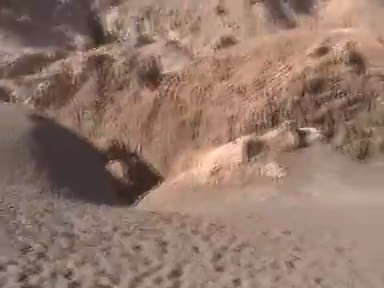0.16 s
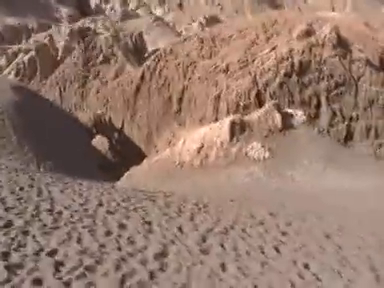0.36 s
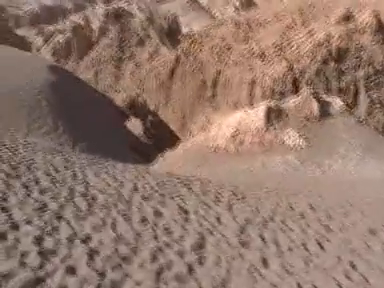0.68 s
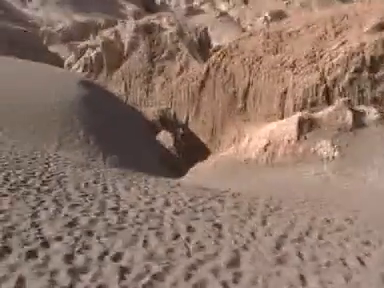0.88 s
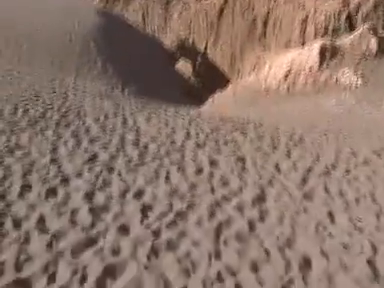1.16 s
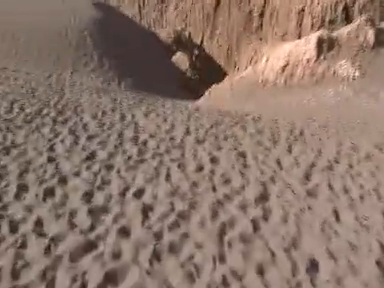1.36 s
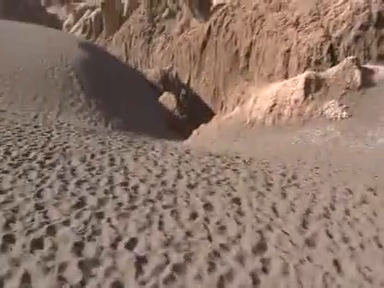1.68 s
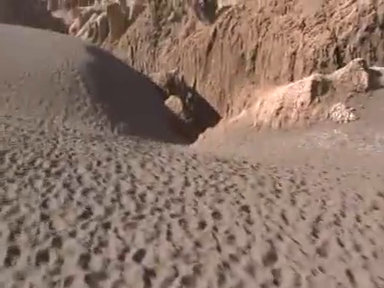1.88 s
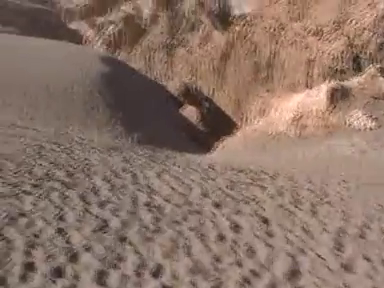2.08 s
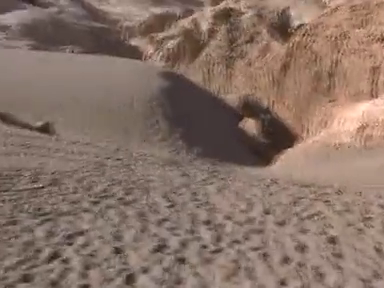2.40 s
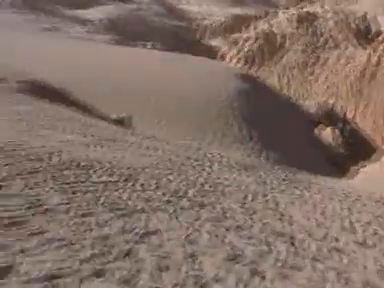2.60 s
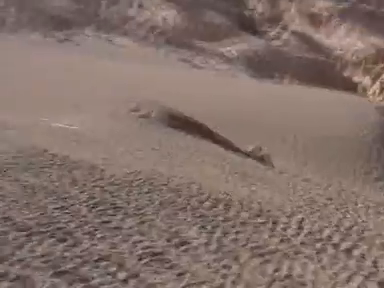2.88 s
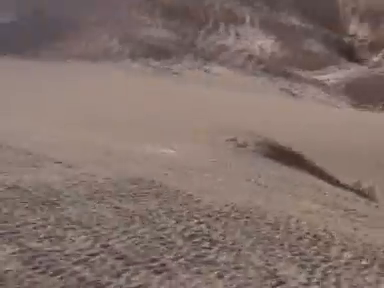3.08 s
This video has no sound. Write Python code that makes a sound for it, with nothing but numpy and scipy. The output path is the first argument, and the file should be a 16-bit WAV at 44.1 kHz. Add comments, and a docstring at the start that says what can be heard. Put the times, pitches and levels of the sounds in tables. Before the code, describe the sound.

Strong wind hits a small unshielded stereo camera microphone on open dunes: ragged rumble throughout, a brief lull near 0.8 seconds, then harder, brighter gusts towards the end, with scattered sharp ticks on either side.

```python
"""A gusty rumble runs throughout, over everything else: wind on open dunes buffets a small camera microphone.
In the bass and mids it pushes one of the two ports while it pulls the other; stronger gusts are louder and brighter.
The hardest eddies overload a port, which snaps back with a tick: a sudden step with a short overshoot.
Blown sand, a coloured noise of changing level, hisses faintly behind the rumble.
Under it all lie the camera's own steady hiss and thin whine."""
import sys
import numpy as np
from scipy import signal
from scipy.fft import rfft, irfft, next_fast_len
from scipy.io import wavfile

SR = 44100
rng = np.random.default_rng(int(sys.argv[2]) if len(sys.argv) > 2 else 0)


def bounce(signal):
    """Save signal as a 16-bit WAV file at the path given by the first command-line argument."""
    frames = np.transpose(np.atleast_2d(signal))
    limited = np.clip(frames, -1, 1)
    pcm = np.round(limited * 32767).astype(np.int16)
    wavfile.write(sys.argv[1], SR, pcm)


N = 143325   # length in samples

# A port snapping back from overload. Each row: time in seconds, height of the step at the louder port in dB,
# left minus right in dB, brightness as the corner of a low-pass in Hz.
SNAP_BACKS = [(0.1114, -12, 32, 9300), (0.274, -25, 17, 4870), (0.4706, -10, 8, 2200),
              (1.7952, -10, 3, 1500), (1.7967, -10, 15, 10300), (1.8431, -18, -5, 6000),
              (2.0585, -30, 24, 9000), (2.378, -20, 25, 9000), (2.4765, -15, 25, 5000),
              (2.4952, 3.5, -30, 9900), (2.5539, -2.5, 30, 10700), (2.764, -24, -8, 9000),
              (2.8685, -2, 39, 10300)]
CUTOFF_HZ = 13500   # the recorder passes nothing much from here up


def from_db(db):
    """Decibels to gain."""
    return 10 ** (np.asarray(db) / 20)


def in_time(rows):
    """Each column of a curve, read at every sample."""
    s, *columns = np.transpose(rows)
    return [np.interp(np.arange(N) / SR, s, column) for column in columns]


def at_hz(points, hz):
    """Reads a table on a log-frequency axis."""
    f, value = np.transpose(points)
    return np.interp(np.log(hz + 1e-9), np.log(f), value)


def drift(corner_hz):
    """Slow chance with spread 1: noise through two equal low-pass poles, run at a tenth of the sample rate."""
    pole = np.exp(-2 * np.pi * corner_hz * 10 / SR)
    noise = rng.standard_normal(N // 10 + 4002)
    slow = signal.lfilter([1], [1, -2 * pole, pole * pole], noise)[4000:]   # without the filter's start
    return np.interp(np.arange(N) / 10, np.arange(len(slow)), slow / slow.std())


def stereo_noise(colour, likeness):
    """Frequencies and spectrum of a coloured noise of rms 1, mixed from mid and side to a left-right likeness."""
    size = next_fast_len(N // 2 + 1) * 2
    hz = np.arange(size // 2 + 1) * SR / size
    gain = from_db(at_hz(colour, hz))
    alike = at_hz(likeness, hz)
    white = rfft(rng.standard_normal((2, size)))
    mid, side = white * gain / np.sqrt(2 * np.mean(gain ** 2))
    return hz, np.sqrt(1 + alike) * mid + np.sqrt(1 - alike) * side * [[1], [-1]]


def buffeting(rumble_db, rush_db):
    """Turbulence in octave bands: the lows follow the rumble, the highs the rush, and eddies shake them together."""
    # Colour of the wind at the ports. Each row: frequency in Hz, relative level in dB per Hz.
    wind_colour = [(25, -79), (45, -59), (80, -53.5), (150, -42), (290, -41.5), (500, -48.5), (1000, -60),
                   (2000, -74.5), (3000, -89.5), (4000, -101.5), (5500, -116), (8000, -142)]
    # The ports move against each other. Each row: frequency in Hz, left-right likeness (-1 opposite, 1 alike).
    port_likeness = [(30, -0.84), (70, -.9), (180, -0.96), (500, -0.84), (1200, -0.77), (2500, -0.51),
                     (5000, 0.075)]
    # Extra level far below deep_bass_hz, half of it there. Each row: time in seconds, level in dB.
    deep_bass = [(0, -1), (.6, 4.5), (1.1, 8.5), (1.6, -2), (2.0, 2.5), (2.6, -4.5), (3.25, -3)]
    # The wind shifts between the ports as the camera turns. Each row: time in seconds, left minus right in dB.
    wind_side = [(0, 1.5), (1.0, 3), (1.4, 0.5), (2.2, 2.2), (2.6, -1.5), (3.25, -1.5)]
    level_db, rush_pan_db = -20, 2.1   # at mean strength; left minus right, added to the rush
    rumble_hz, rush_hz, deep_bass_hz = 289, 2010, 110   # all rumble below, all rush above, a blend between
    treble_swing = 0.96   # extra share of the rush's swing an octave above rush_hz
    eddy_hz, eddy_low_db, eddy_high_db = 66, 1.4, 2.5   # flutter shared by all bands
    burst_hz, burst_db = 250, 2.5   # fine raggedness of the rush
    patch_hz, patch_db = 24.6, 1.0   # each band's own flutter

    hz, spectrum = stereo_noise(wind_colour, port_likeness)
    eddies, bursts = drift(eddy_hz), drift(burst_hz)
    deep_db = in_time(deep_bass)[0]
    ears = np.array([[.5], [-.5]])   # left, right
    centres = 31.25 * 2. ** np.arange(9)
    wind = 0
    for centre, peak in zip(centres, np.eye(len(centres))):
        band_share = at_hz(np.c_[centres, peak], hz)   # overlapping bands whose shares add up to 1
        band = irfft(spectrum * band_share)[:, :N]
        high = np.clip(np.log(centre / rumble_hz) / np.log(rush_hz / rumble_hz), 0, 1)
        swing = 1 + treble_swing * np.clip(np.log2(centre / rush_hz), 0, 1)
        low_db = rumble_db + eddy_low_db * eddies + deep_db / (1 + (centre / deep_bass_hz) ** 2)
        high_db = swing * rush_db + eddy_high_db * eddies + burst_db * bursts + rush_pan_db * ears
        flutter_db = patch_db * drift(patch_hz)
        wind = wind + band * from_db((1 - high) * low_db + high * high_db + flutter_db)
    return wind * from_db(level_db + surges() + in_time(wind_side)[0] * ears)


def surges():
    """Extra level in dB of the hard eddies that set off the snaps: a brief swell around each one."""
    surge_db, surge_s = 3, 0.0032   # at a step of 0 dB; time from the peak to 1/e of it
    t = np.arange(N) / SR
    # the swell grows with the square root of the step
    return sum(surge_db * from_db(db / 2) * np.exp(-((t - s) / surge_s) ** 2) for s, db, _, _ in SNAP_BACKS)


def snaps(rush_db):
    """Pressure builds on a port for a fraction of a millisecond, lets go at once and overshoots."""
    build_s, recover_s, overshoot = 0.00041, 0.00042, 0.24   # time constants; share of the step
    low_cut_hz = 160   # snaps carry no deep bass
    # tiny snaps, thicker in gusts: both ports together and typical height, at the mean rush
    crackles_per_s, crackle_db, crackle_spread_db = 12, -47.5, 6
    crackle_follows, crackle_grows = 1, 0.81   # shares of the rush's swing in their number and size

    chance = crackles_per_s / 2 * from_db(crackle_follows * rush_db) / SR
    spread_db = crackle_spread_db * np.clip(rng.standard_normal((2, N)), -2, 2)
    sizes = from_db(crackle_db + crackle_grows * rush_db + spread_db)
    steps = (rng.random((2, N)) < chance) * sizes
    t = np.arange(-200, 201) / SR
    for s, db, pan_db, bright_hz in SNAP_BACKS:
        low_pass = signal.butter(2, bright_hz, fs=SR)
        release = signal.lfilter(*low_pass, signal.unit_impulse(len(t)))
        port_gains = from_db(db + np.minimum([pan_db, -pan_db], 0))   # only the far port is turned down
        start = int(s * SR)
        steps[:, start:start + len(t)] += np.outer(port_gains, release)
    build = (overshoot - 1) * np.exp(-abs(t) / build_s)
    recovery = overshoot * np.exp(-abs(t) / recover_s)
    shape = np.where(t < 0, build, recovery)
    ticks = signal.fftconvolve(steps, shape[None], "same", axes=1)
    return signal.lfilter(*signal.butter(1, low_cut_hz, "high", fs=SR), ticks)


def sand():
    """Smooth hiss of grains drifting over the dune: coloured noise, largely alike in both ears."""
    # Level of the hiss before gain_db. Each row: time in seconds, level in dB.
    sand_level = [(0, -85), (.38, -69.5), (.5, -81), (.68, -83), (.76, -69), (.9, -69), (1.04, -58),
                  (1.17, -62.5), (1.25, -74), (1.46, -71), (1.52, -69), (1.8, -63), (1.96, -90),
                  (2.18, -82), (2.3, -67), (2.95, -73), (3.25, -65.5)]
    # Colour of the grains. Each row: frequency in Hz, relative level in dB per Hz.
    grain_colour = [(300, 3), (1500, 5), (3000, 4.5), (5000, 3.5), (7000, 0.5), (8700, 0.5), (11000, -7),
                    (12500, -14)]
    gain_db, likeness = 1.5, 0.74
    _, spectrum = stereo_noise(grain_colour, [(CUTOFF_HZ, likeness)])
    return irfft(spectrum)[:, :N] * from_db(in_time(sand_level)[0] + gain_db)


def electronics():
    """The camera's own hiss, a steady coloured noise, with a thin, steady sine whine in it."""
    # Colour of the microphone's hiss. Each row: frequency in Hz, relative level in dB per Hz.
    mic_colour = [(300, 0.5), (2000, 11), (6000, -1), (8700, 1), (12500, -9)]
    hiss_db, likeness = -72.5, 0.54
    whine_hz, whine_db = 11025, -87
    _, spectrum = stereo_noise(mic_colour, [(CUTOFF_HZ, likeness)])
    hiss = from_db(hiss_db) * irfft(spectrum)[:, :N]
    whine = from_db(whine_db) * np.sin(2 * np.pi * whine_hz * np.arange(N) / SR)
    return hiss + whine


def scene():
    """The gusts drive both the buffeting and the snaps; sand and camera hiss lie behind."""
    # Gusts at the ports; only the swing about each level's mean counts.
    # Each row: time in seconds, level of the rumble in dB, level of the rush above 1 kHz in dB.
    gust_levels = [(0.0, -14.5, -43), (0.025, -19.5, -50), (0.125, -16, -33.5), (0.15, -22, -47.5),
                   (0.205, -17, -35), (0.259, -18.5, -42.5), (0.274, -19.5, -39.5), (0.354, -20.5, -45),
                   (0.374, -20.5, -42.5), (0.474, -19, -44), (0.549, -30, -63), (0.594, -19.5, -46.5),
                   (0.634, -27.5, -48), (0.698, -25, -46), (0.728, -28, -61), (0.793, -31.5, -66),
                   (0.878, -18, -51), (0.893, -24.5, -67), (0.948, -23.5, -50), (0.963, -23.5, -49),
                   (0.983, -20, -46), (1.068, -16, -35), (1.098, -20.5, -43.5), (1.117, -16, -34.5),
                   (1.267, -21, -37.5), (1.372, -22.5, -45.5), (1.397, -17.5, -29.5), (1.452, -20.5, -37.5),
                   (1.492, -17, -34), (1.512, -26, -45), (1.546, -17, -39), (1.701, -18.5, -36.5),
                   (1.716, -16.5, -39.5), (1.741, -24.5, -49), (1.776, -19, -49), (1.791, -17.5, -32.5),
                   (1.846, -13.5, -30.5), (2.005, -18, -40.5), (2.02, -22.5, -49), (2.065, -13, -33.5),
                   (2.135, -20, -42.5), (2.15, -27, -46), (2.18, -23, -47.5), (2.305, -14.5, -38.5),
                   (2.325, -20.5, -42), (2.375, -9, -28.5), (2.434, -19.5, -35), (2.459, -15.5, -31),
                   (2.554, -14, -29), (2.584, -23, -36.5), (2.679, -19.5, -30.5), (2.784, -17, -32),
                   (2.883, -14, -26.5), (2.978, -22.5, -36), (3.053, -18, -31), (3.158, -17.5, -31.5),
                   (3.213, -26, -55), (3.248, -34, -53)]
    rumble_db, rush_db = [level - level.mean() for level in in_time(gust_levels)]
    return buffeting(rumble_db, rush_db) + snaps(rush_db) + sand() + electronics()


def record(dry):
    """The recorder clips just under full scale, then a steep low-pass cuts the top."""
    headroom = .88   # of full scale
    low_pass = signal.cheby2(14, 60, CUTOFF_HZ, fs=SR, output="sos")   # 60 dB down from the cutoff up
    return signal.sosfilt(low_pass, np.clip(dry, -headroom, headroom))


dry = scene()
out = record(dry)
bounce(out)
```